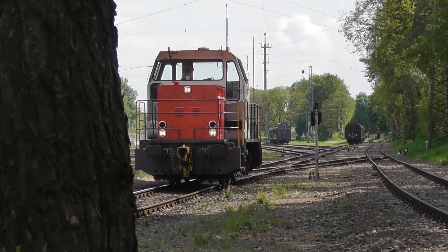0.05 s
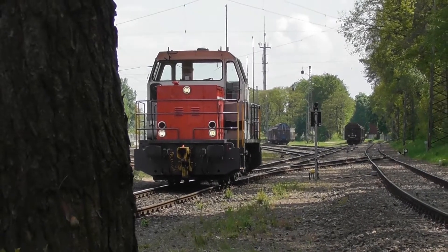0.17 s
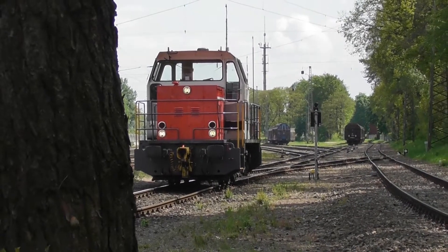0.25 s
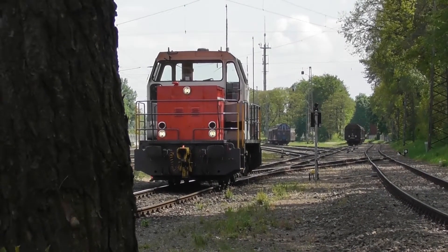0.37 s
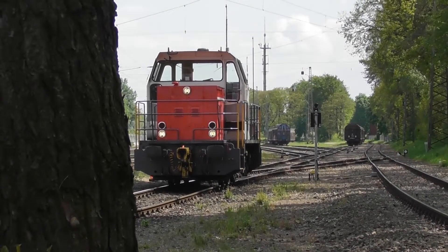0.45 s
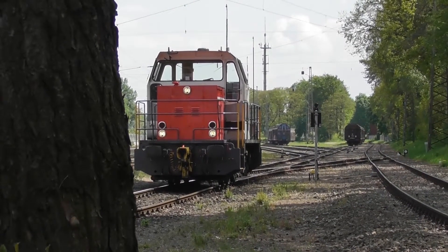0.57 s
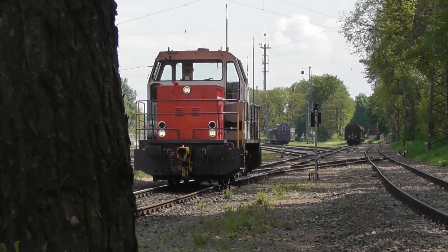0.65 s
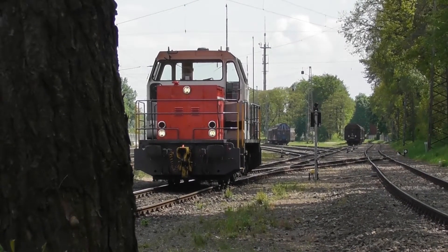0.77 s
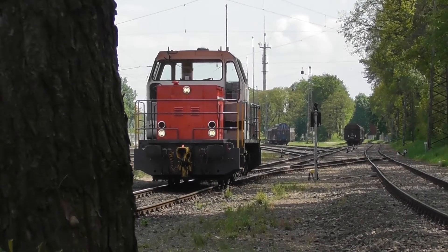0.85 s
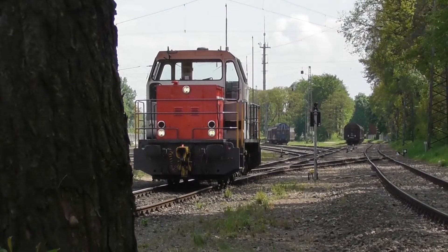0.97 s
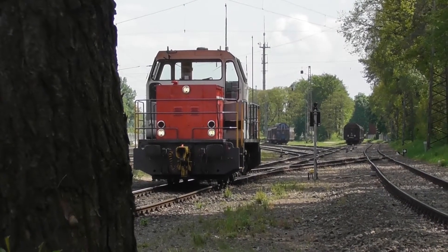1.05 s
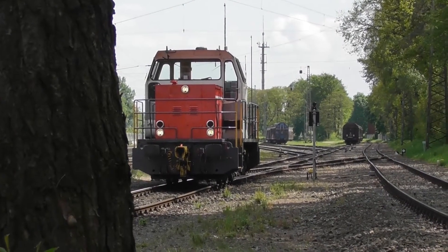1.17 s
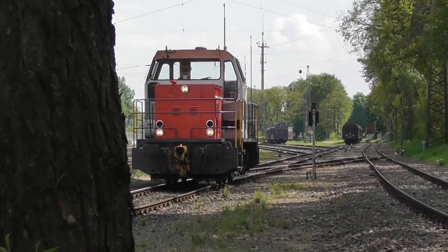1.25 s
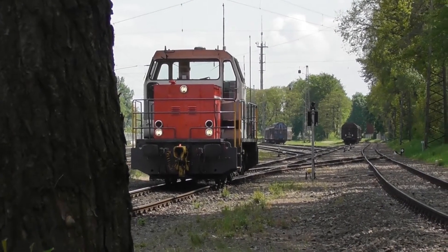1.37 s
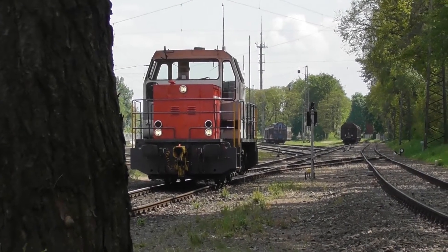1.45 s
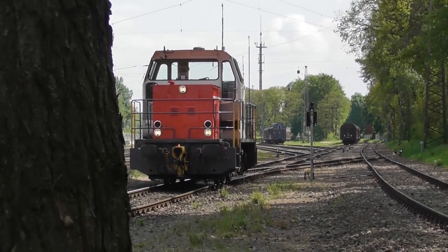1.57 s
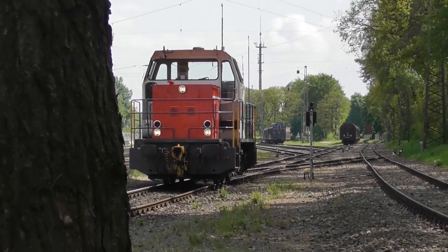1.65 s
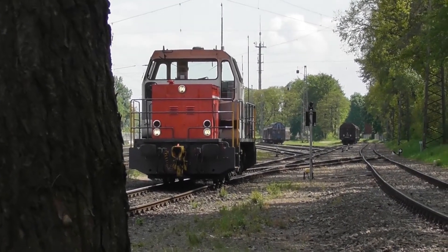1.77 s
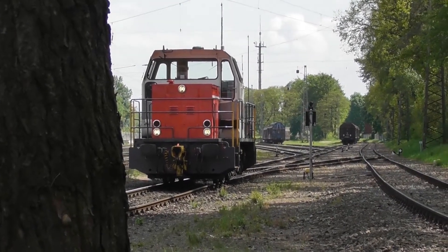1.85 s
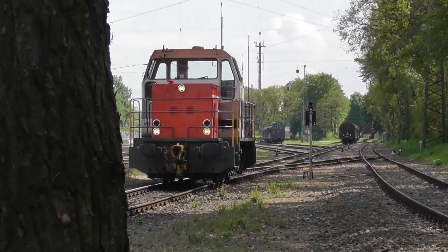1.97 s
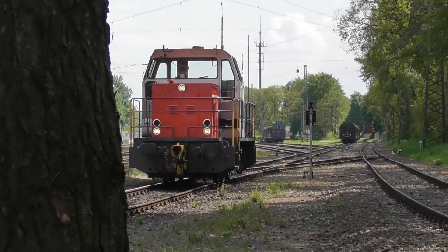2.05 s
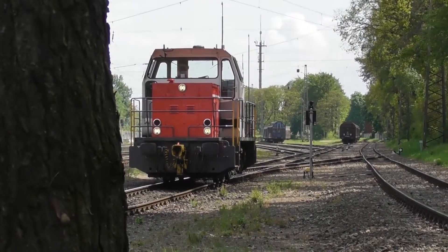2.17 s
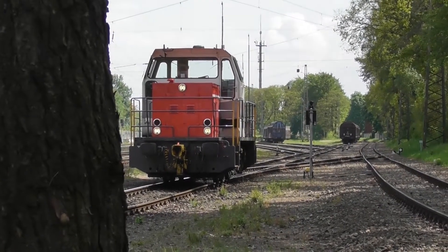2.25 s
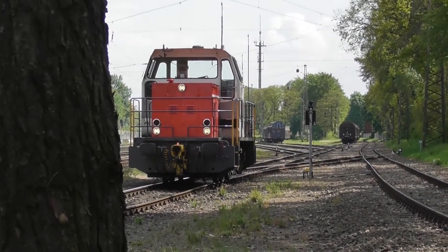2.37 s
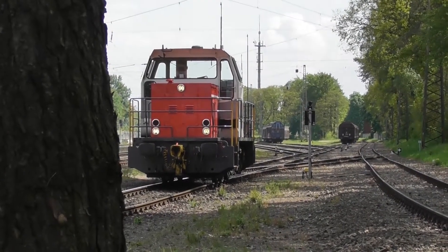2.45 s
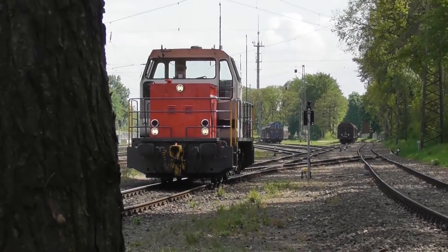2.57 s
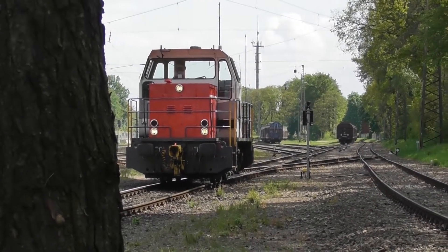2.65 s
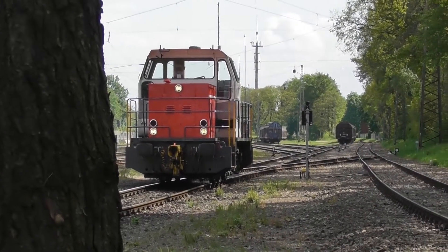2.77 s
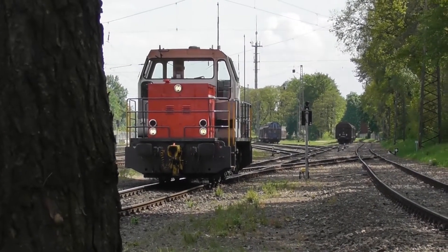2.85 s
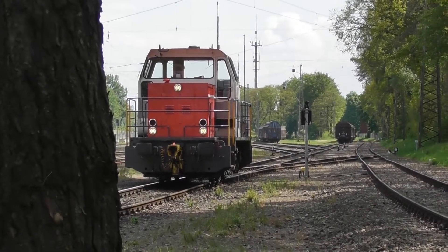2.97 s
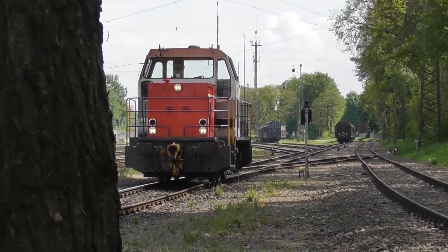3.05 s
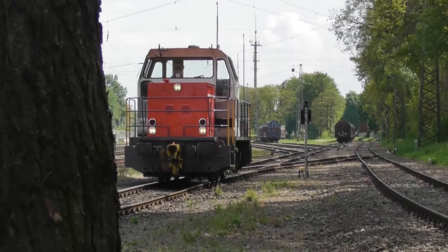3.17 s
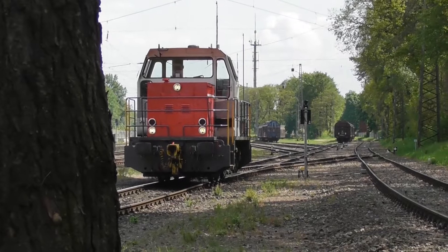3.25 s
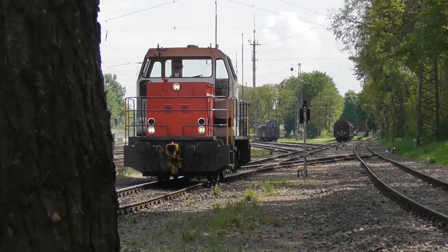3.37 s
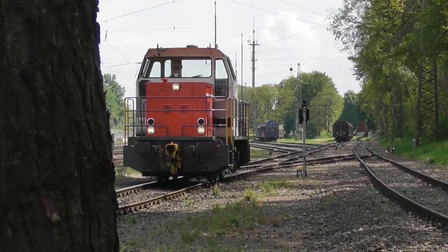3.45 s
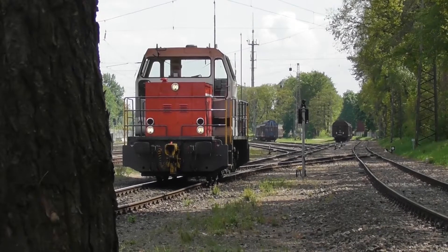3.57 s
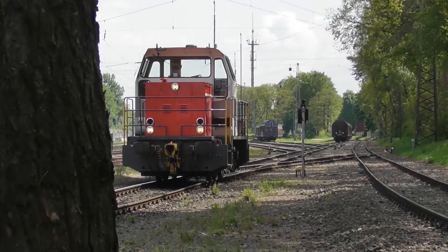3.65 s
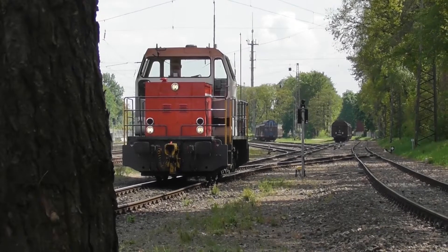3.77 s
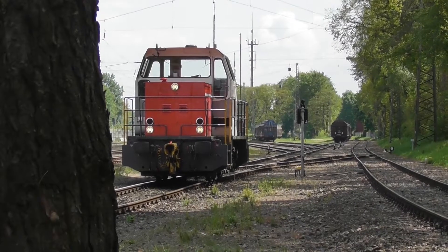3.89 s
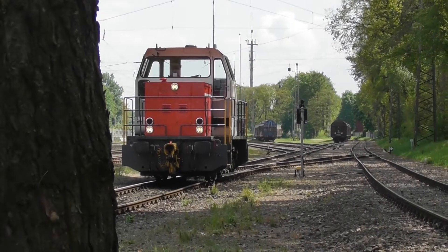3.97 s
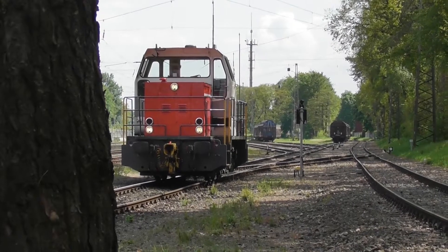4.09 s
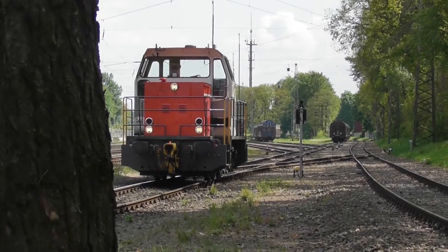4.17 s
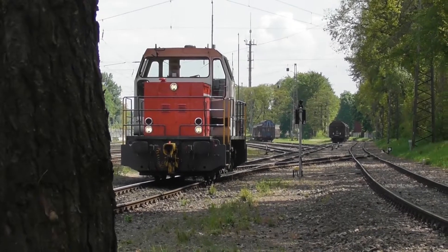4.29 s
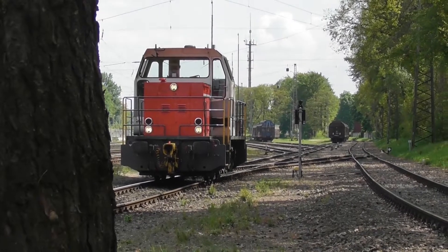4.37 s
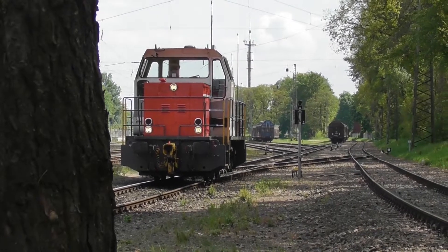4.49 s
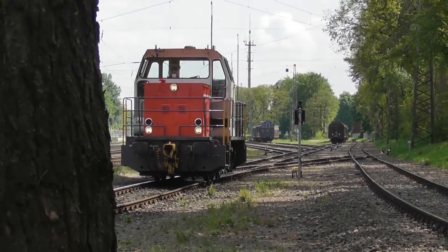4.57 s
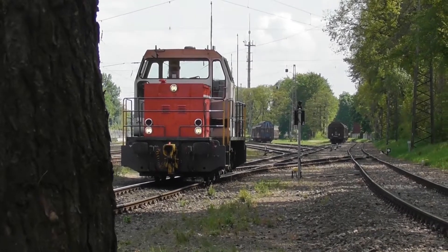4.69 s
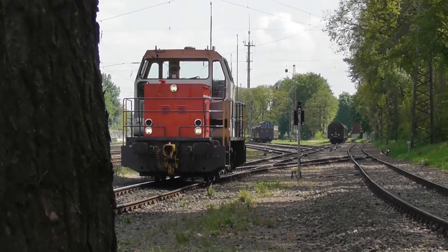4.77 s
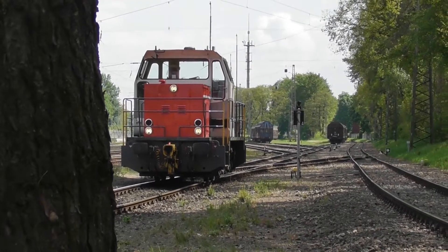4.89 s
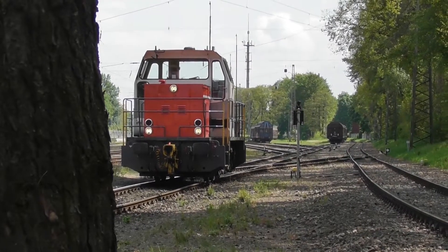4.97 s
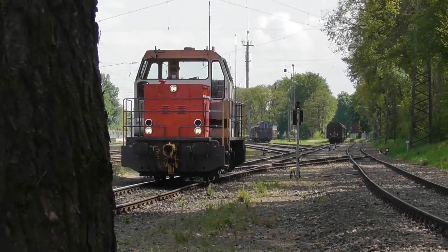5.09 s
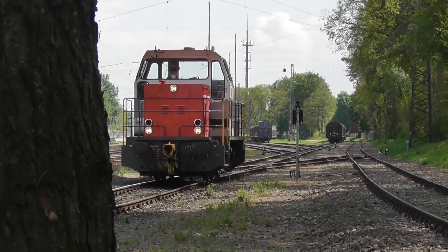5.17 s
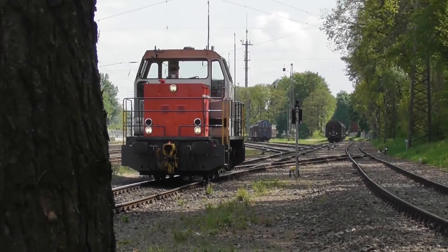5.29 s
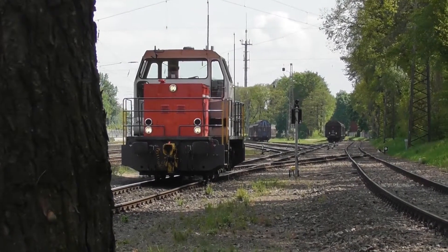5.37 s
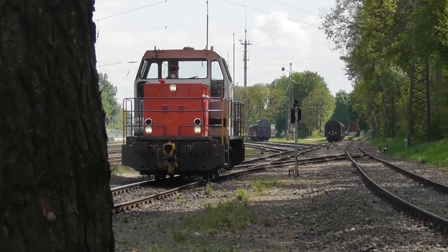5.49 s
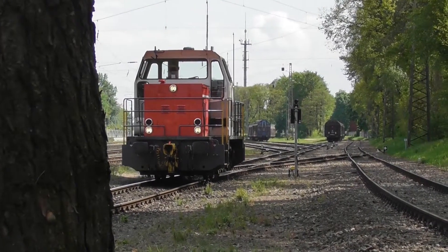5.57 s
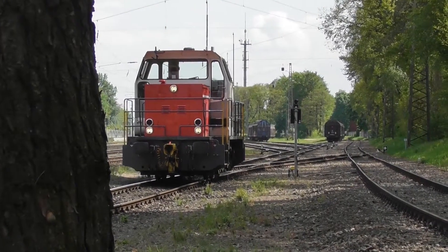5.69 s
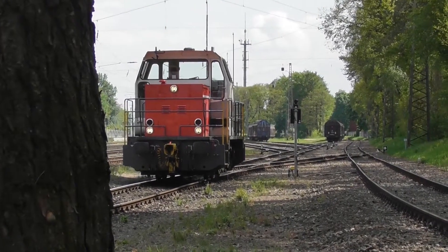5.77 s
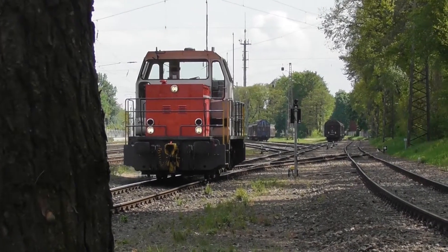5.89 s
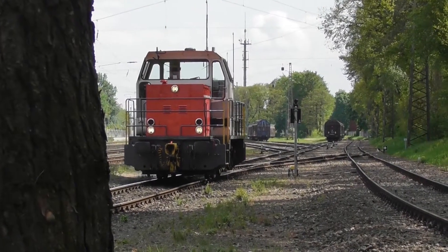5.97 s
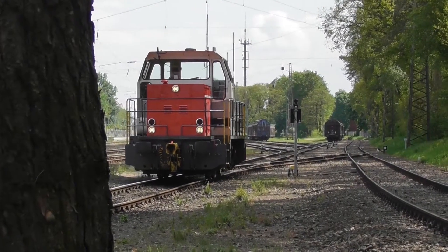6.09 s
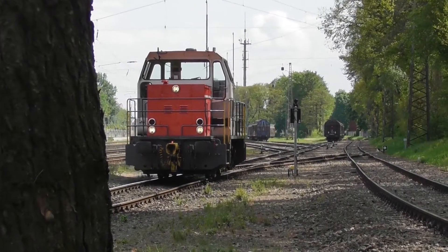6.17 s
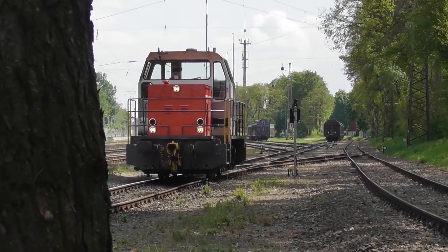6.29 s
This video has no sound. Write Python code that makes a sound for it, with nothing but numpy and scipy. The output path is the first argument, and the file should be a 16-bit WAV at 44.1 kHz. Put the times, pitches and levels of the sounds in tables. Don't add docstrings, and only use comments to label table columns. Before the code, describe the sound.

Outdoors in a wooded rail yard, a diesel locomotive idles with a soft low rumble and muffled engine roar while brake air hisses and fades. The throttle opens after about a second and the exhaust becomes a deep, booming throb. A fan hum joins and birds chirp from the trees. Near five seconds a second step pushes pitch and power higher until the end. A stereo microphone adds faint hiss.

```python
import sys
import numpy as np
from scipy import signal
from scipy.io import wavfile
from scipy.ndimage import uniform_filter1d

SR = 44100
rng = np.random.default_rng(int(sys.argv[2]) if len(sys.argv) > 2 else 0)


def voltage_ratio(decibels):
    exponent = np.asarray(decibels, float) / 20
    return 10 ** exponent


def materialize(psi):
    bounded = np.clip(np.atleast_2d(psi).T, -1, 1)
    quanta = np.round(bounded * 32767).astype(np.int16)
    wavfile.write(sys.argv[1], SR, quanta)


N = 279153

# time in seconds, speed in engine cycles per second.
SPEED = [(0, 4.8), (1.08, 4.76), (1.26, 4.84), (1.44, 5.1), (1.8, 5.76), (1.98, 6.012), (2.16, 6.116),
         (2.5, 6.18), (2.9, 6.197), (3.96, 6.1), (4.14, 6.183), (4.32, 6.337), (4.5, 6.612), (5.04, 7.55),
         (5.4, 8.075), (5.76, 8.505), (6.0, 8.665), (6.33, 8.755)]
IDLE_SPEED, FULL_SPEED = 4.78, 8.6

HZ, FRAMES = np.fft.rfftfreq(2048, 1 / SR), np.arange(N // 512 + 5) * 512 / SR


def evened(x):
    return x / np.sqrt(np.mean(x ** 2) + 1e-20)


def read(points, hz):
    f, value = np.transpose(points)
    return np.interp(np.log(hz + 1), np.log(f + 1), value)


def curves(rows, x):
    places, *columns = np.transpose(rows)
    return [np.interp(x, places, column) for column in columns]


def add(mix, s, sound):
    part = mix[round(s * SR):][:len(sound)]
    part += sound[:len(part)]


def drift(per_s):
    span = int(SR / per_s)
    return evened(uniform_filter1d(uniform_filter1d(rng.standard_normal(N), span), span))


def resonate(x, hz, width):
    turn = np.exp(2j * np.pi * np.cumsum(hz * np.ones(len(x))) / SR)
    r = np.exp(-np.pi * width / SR)
    return 2 * (turn * signal.lfilter([1 - r], [1, -r], x / turn)).real


def noise(level_db, same, patchy_db=0.0):
    a, b, c, d, patches = rng.standard_normal((len(FRAMES), len(HZ), 5)).T
    patches = evened(uniform_filter1d(uniform_filter1d(patches, size=6, axis=0), size=10, axis=1))
    same = np.clip(same, -1, 1)
    left = a + 1j * b
    right = same * left + np.sqrt(1 - same ** 2) * (c + 1j * d)
    gain = voltage_ratio(level_db + patchy_db * patches)
    gain /= np.sqrt((voltage_ratio(level_db) ** 2).sum(0))
    z = np.array([left, right]) * gain
    return evened(signal.istft(z, nperseg=2048, noverlap=1536)[1][:, :N])


def effort_at(t):
    speed, later, earlier = (curves(SPEED, t + s)[0] for s in (0, .15, -.15))
    pull = (later - earlier) / .3
    above_idle = (speed - IDLE_SPEED) / (FULL_SPEED - IDLE_SPEED)
    return np.clip(above_idle + 0.047 * pull, 0, 1), pull


def exhaust(t):
    # multiple of the engine cycle, level in dB.
    order_levels = [(3, -9), (4, -30), (5, -28), (6, 0), (7, -25), (8, -23), (9, 2), (10, -21), (11, -21),
                    (12, -21), (13, -27), (14, -24), (15, -9), (16, -24), (17, -24), (18, -14), (24, -17),
                    (27, -18), (28, -16), (30, -15)]
    # frequency in Hz, gain in dB.
    silencer = [(15, -45), (28, -32), (37, -26.5), (42, -29.5), (47, -21), (52, -12), (58, -5), (64, -6.5),
                (70, -14.5), (78, -22.5), (88, -13.5), (105, -25), (130, -28.5), (172, -21.5), (210, -33.5)]
    # time in seconds, load rise in dB, spread in seconds.
    throttle_steps = [
        (1.33, 8., 0.081),
        (4.85, 5.5, 0.077),
    ]
    notch_hz = 41
    spread_s_per_hz = -.0004
    idle_load_db, surge_db = -21., -0.05

    speed, = curves(SPEED, t)
    turns = np.cumsum(speed) / SR + 1 / 3
    pulses = np.zeros(N)
    for order, db in order_levels:
        k = round(order)
        hz = k * speed
        strong = db > -12
        flip = np.pi * np.clip((notch_hz - hz) / 2.6 + .5, 0, 1)
        uneven_db = (.4 if strong else 2.) * drift(4.) - (db < -20) * .9 * (speed - IDLE_SPEED)
        slip = (.03 if strong else .4 + .3 * (speed - 4.7)) * drift(1.5)
        late = np.pi * spread_s_per_hz * (hz - 55) ** 2 + .5
        level = voltage_ratio(db + read(silencer, hz) + uneven_db) * np.sqrt(2)
        pulses += level * np.cos(2 * np.pi * k * turns + flip + slip - late)

    gust_db = 0.34 * read(silencer, HZ) - 40 * (abs(HZ - 65) > 50)
    gust_db -= 12. * np.clip((42 - HZ) / 12, 0, 1)
    gusts = noise(gust_db[:, None], 0.95)
    load_db = idle_load_db + surge_db * effort_at(t)[1]
    for s, rise_db, spread in throttle_steps:
        load_db = load_db + rise_db / (1 + np.exp((s - t) / spread))
    return voltage_ratio(load_db) * pulses + voltage_ratio(0.52 * load_db - 33.5) * gusts


def roar(t):
    # frequency in Hz, level in dB per Hz.
    idle_tone = [(60, -38), (105, -19), (170, -5.5), (230, -0.5), (400, -7.5), (590, -4.5), (780, -10),
                 (1050, -12.5), (1450, -23), (2100, -22), (2900, -27), (3600, -28.5), (4600, -37.5),
                 (6500, -70)]
    full_tone = [(59, -37), (100, 2), (151, -7), (252, -0.5), (408, -6.5), (436, -7), (514, -2.5),
                 (790, -10.5), (1080, -5.5), (1460, -21.5), (2090, -21), (2960, -29), (3800, -25.5),
                 (4560, -37), (5200, -80.5), (6760, -70), (11400, -120)]
    # frequency in Hz, width in Hz, boost in dB.
    panels = [(178.3, 8.6, 17), (252.9, 14.8, 5.5), (517, 7, 0), (891.4, 23, 9), (1160, 480, 2),
              (2168, 42, 5), (3440, 65, 4.5), (3900, 130, 0.5)]
    # frequency in Hz, likeness of left and right (1 is identical).
    likeness = [(60, 0.38), (120, 0.73), (240, 0.88), (340, 1), (600, 0.89), (1100, .98), (1900, .95),
                (3000, 1)]
    turbo_db, turbo_sag_db, turbo_pull_db = 2.54, 2, 0.3
    edge_hz = 4320

    effort, pull = effort_at(FRAMES)
    shape_db = np.outer(read(idle_tone, HZ), 1 - effort) + np.outer(read(full_tone, HZ), effort)
    top_db = turbo_db - turbo_sag_db * np.sin(np.pi * effort) + turbo_pull_db * pull
    shape_db += np.outer(np.clip((HZ - 2400) / 1300, 0, 1), top_db)
    for hz, width, db in panels:
        shape_db += (db / (1 + (2 * (HZ - hz) / width) ** 2))[:, None]
    shape_db -= 18.0 / (1 + np.exp(np.clip((edge_hz - HZ) / 26.0, -50, 50)))[:, None]
    body = noise(shape_db, read(likeness, HZ)[:, None], patchy_db=0.18)
    return body * voltage_ratio(-37. + 8. * effort_at(t)[0])


def fan(t):
    ratio, lag_s = 36.2, .37
    top_hz, knee_hz = 290, 12
    speed = curves(SPEED, t)[0]
    driven_hz = ratio * curves(SPEED, t - lag_s)[0]
    hz = -knee_hz * np.logaddexp(-driven_hz / knee_hz, -top_hz / knee_hz)
    db = -56 + 16.5 / (1 + (2 * (hz - 252.5) / 49) ** 2)
    tone = np.sin(2 * np.pi * np.cumsum(hz + 1.2 * drift(5.)) / SR)
    throb = 1 + .7 * np.cos(2 * np.pi * (np.cumsum(speed) / SR + .43))
    fade_in = np.clip((t - 1.5) / .3, 0, 1)
    return tone * throb * voltage_ratio(db + 3 + 1.5 * drift(3.)) * fade_in


def bleed(t):
    # frequency in Hz, width in Hz, level in dB.
    valve_bands = [(4550, 660, -11.5), (5330, 25, -1.5), (5580, 210, -7), (7140, 75, -11), (7530, 30, -5.5),
                   (8140, 60, -1), (8240, 40, -11), (8600, 280, 2), (10500, 40, -16), (11070, 180, -1)]
    burst_db, burst_s = 2.5, .35
    shut_s, shut_db_per_s = 2.7, -30.

    power = voltage_ratio(-8.5) ** 2 * np.exp(-((HZ - 8600) / 1900) ** 2)
    for hz, width, db in valve_bands:
        power += voltage_ratio(db) ** 2 / (1 + (2 * (HZ - hz) / (width + 25)) ** 2)
    dulling = 1.6 * (1 - np.exp(-FRAMES / burst_s)) + .2 * FRAMES
    dulling_db = -2.5 * np.outer(np.clip((HZ - 7000) / 1300, .3, 3.5), dulling)
    air = noise(10 * np.log10(power)[:, None] + dulling_db, .95, patchy_db=.6)
    fade_db = -4.5 * t + shut_db_per_s * np.maximum(t - shut_s, 0)
    return air * voltage_ratio(-52.5 + burst_db * np.exp(-t / burst_s) + fade_db)


def birds():
    # start in seconds, length in seconds, first Hz, last Hz, level in dB.
    whistles = [(3.795, .027, 3300, 4250, -47), (3.82, .068, 4130, 4370, -52),
                (3.885, .055, 4180, 4350, -61), (3.935, .125, 3850, 4350, -58),
                (4.055, .13, 4330, 4380, -65), (4.208, .028, 3050, 4100, -53), (4.3, .018, 3990, 3790, -53),
                (4.322, .023, 4880, 4935, -64), (4.352, .024, 3710, 3880, -48),
                (4.385, .08, 4900, 4950, -74), (3.53, .045, 6600, 6590, -67), (3.59, .06, 6580, 6600, -73),
                (3.69, .022, 6800, 6720, -64), (3.71, .014, 6720, 6050, -65), (3.73, .1, 6800, 6800, -71),
                (6.115, .045, 5000, 5800, -70)]
    # start in seconds, length in seconds, pitch in Hz, width in Hz, level in dB.
    buzzes = [
        (2.415, .25, 7050, 550, -62.5),
        (2.42, .22, 7900, 350, -65.5),
        (5.12, .13, 8600, 400, -72),
        (2.24, .13, 8700, 400, -74),
    ]
    glide_s, rise_s, fade_db_per_s = .028, .006, -45.

    calls = np.zeros(N)
    flutter = drift(150.)
    for s, length, first_hz, last_hz, db in whistles:
        t = np.arange(0, length, 1 / SR)
        glide = np.sin(np.pi / 2 * np.minimum(t / glide_s, 1)) ** 1.5
        hz = first_hz + (last_hz - first_hz) * glide + 55. * flutter[:len(t)]
        note = np.sqrt(2) * np.sin(2 * np.pi * np.cumsum(hz) / SR)
        swell = np.minimum(t / rise_s, 1) * voltage_ratio(db + fade_db_per_s * t)
        add(calls, s, note * swell * signal.windows.tukey(len(t), .01 / (t[-1] - t[0])))
    for s, length, hz, width, db in buzzes:
        t = np.arange(0, length, 1 / SR)
        rasp = rng.standard_normal(SR)[:len(t)] * (1 + 0.44 * np.cos(2 * np.pi * 84.0 * t))
        buzz = evened(resonate(resonate(rasp, hz, width), hz, width))
        add(calls, s, voltage_ratio(db) * buzz * signal.windows.tukey(len(t), .15))

    echoes = rng.standard_normal((2, SR // 2)) * voltage_ratio(-60 * np.arange(SR // 2) / SR / .45)
    echoes /= np.linalg.norm(echoes[0])
    wet = signal.fftconvolve(calls[None], echoes, axes=1)[:, :N]
    return calls + voltage_ratio(-4.) * wet


def scene():
    t = np.arange(N) / SR
    return exhaust(t) + roar(t) + fan(t) + bleed(t) + birds()


def ports(x):
    # frequency in Hz, left minus right in dB, left lead in radians.
    port_pair = [
        [(40, -6.5, 0.34), (70, -8, 0.3), (120, -11, 0.23), (240, -3, 0.91), (340, -3, 0.62), (500, 0, 0.49),
         (750, -.9, 0.26), (1100, -.5, 0.018), (3000, -1, 0.32)],
        [(40, 4, 0.12), (69.5, 2.8, -0.28), (120, -2.5, -0.54), (240, -1.5, 0.1), (340, -5.5, 0.34),
         (500, -2, 0.2), (750, -3, 0.15), (1100, -0.5, 0.33), (3000, -2, 0.054)],
    ]
    _, s, z = signal.stft(x, SR, nperseg=2048, noverlap=1536)
    settled = 0.75 * (1 - np.exp(-(np.maximum(s - 0.83, 0) / 2) ** 2))
    lag = 0.79 * np.exp(-((s - 2.16) / .65) ** 2)
    quiet, loud = (np.array(curves(rows, HZ))[:, :, None] for rows in port_pair)
    lean_db, lead = quiet + settled * (loud - quiet)
    half = voltage_ratio(lean_db / 2) * np.exp(.5j * (lead - np.outer(HZ < 110, lag)))
    return signal.istft(z * np.array([half, 1 / half]), nperseg=2048, noverlap=1536)[1][:, :N]


def microphone_hiss():
    # frequency in Hz, level in dB per Hz.
    hiss_tone = [(2710, -29), (4600, -0.5), (5410, -8), (6980, -1.5), (7840, 1.5), (8680, 3.5), (10400, 3),
                 (11200, 3), (15500, 2)]
    same = read([(5000, 0.83), (9000, 0.6), (14000, 0.22)], HZ)[:, None]
    return voltage_ratio(-57) * noise(read(hiss_tone, HZ)[:, None], same, patchy_db=1.2)


def roll_off(x):
    return signal.sosfilt(signal.butter(12, 15640, fs=SR, output="sos"), x)


def record(dry):
    mix = ports(dry) + microphone_hiss()
    return roll_off(mix)


dry = scene()
out = record(dry)
materialize(out)
```